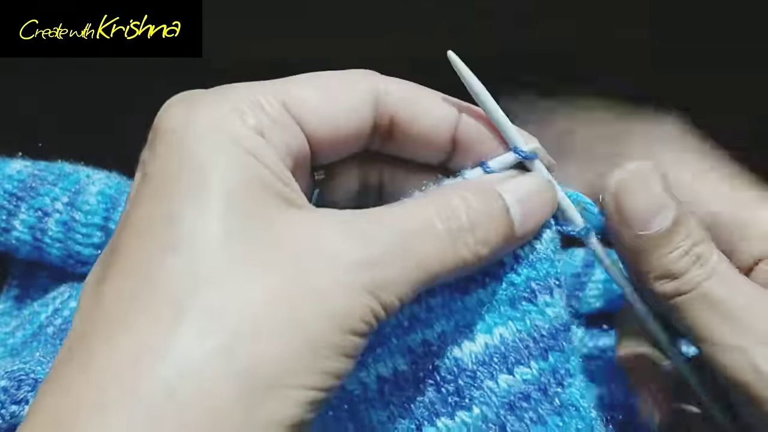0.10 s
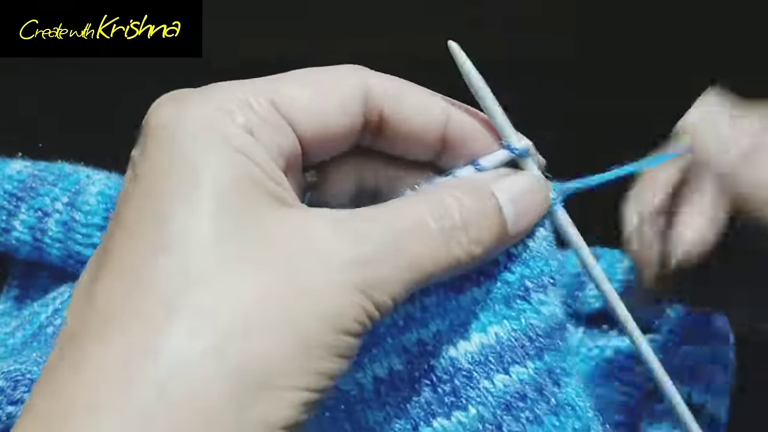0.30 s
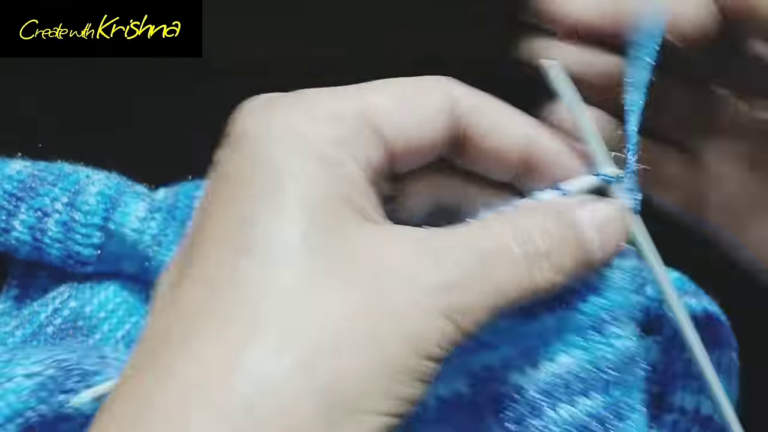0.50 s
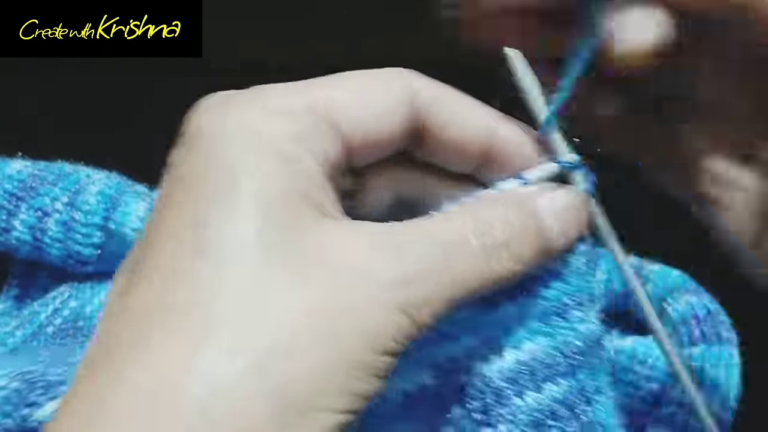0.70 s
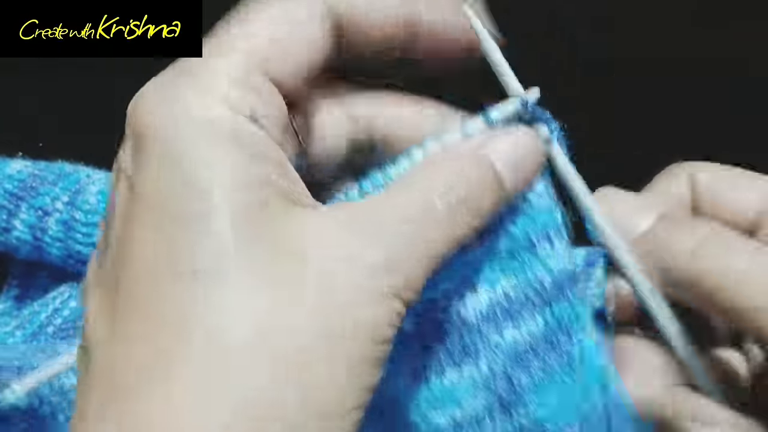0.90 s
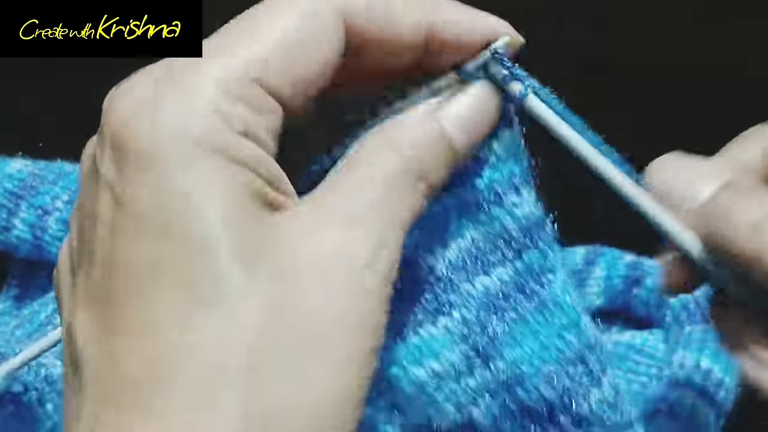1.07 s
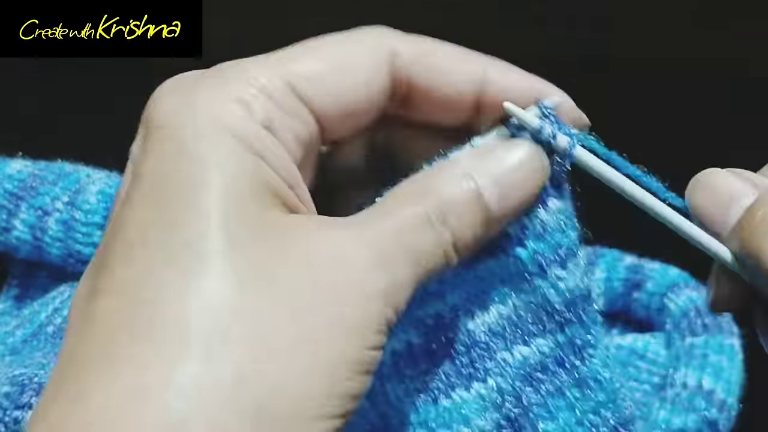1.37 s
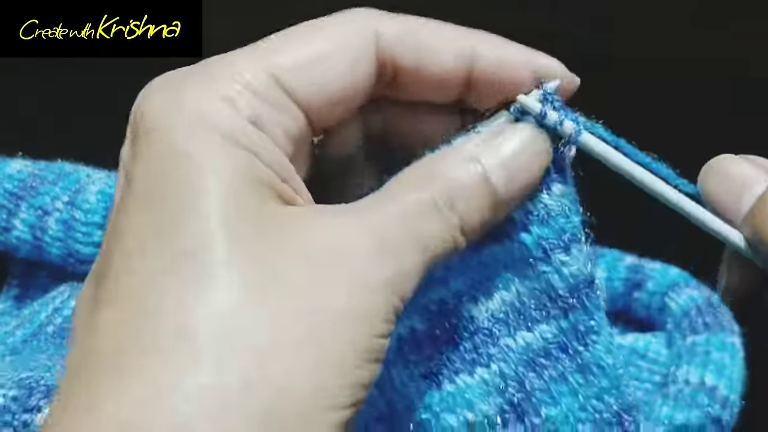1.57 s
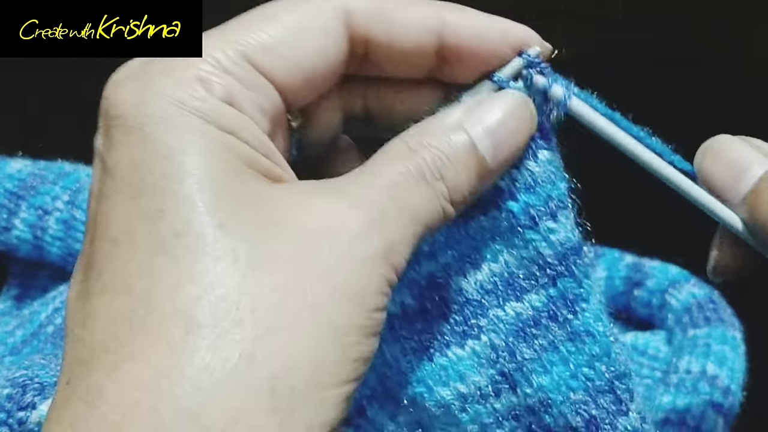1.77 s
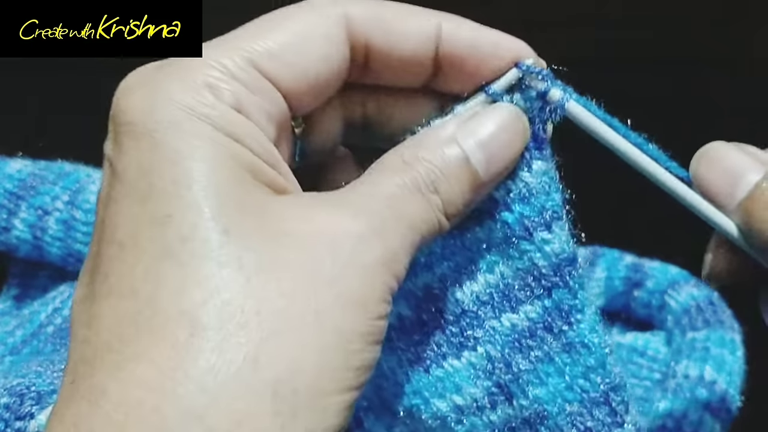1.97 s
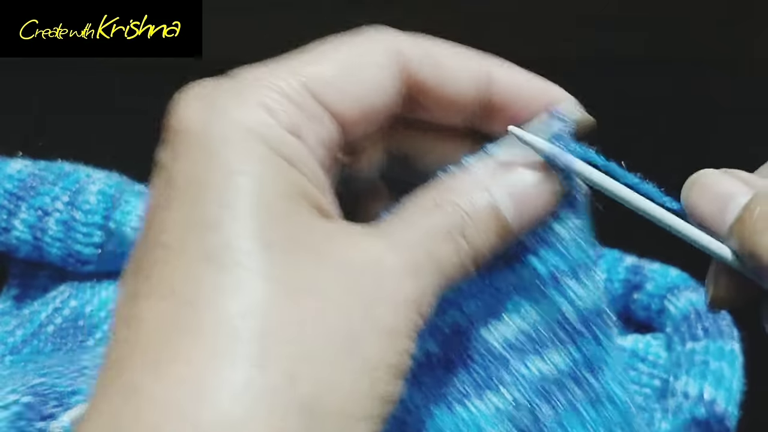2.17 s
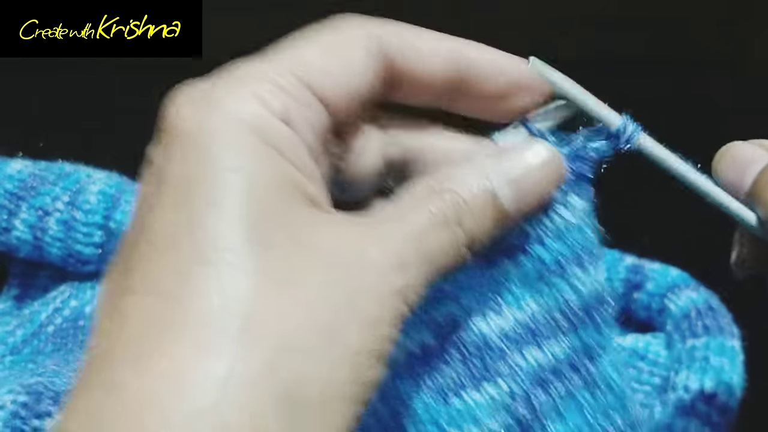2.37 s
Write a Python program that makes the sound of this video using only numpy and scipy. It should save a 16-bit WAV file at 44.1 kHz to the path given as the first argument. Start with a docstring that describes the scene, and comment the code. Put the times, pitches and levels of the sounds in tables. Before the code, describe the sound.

Metal knitting needle's end cracks and rings once, then faint scrapes, wool slides and tiny clicks over low hum.

```python
"""Knitting with metal needles

Close-up knitting in a quiet room. The free end of one needle knocks on a hard surface: a noisy crack,
ringing sine tones and a low thud. It taps twice more and drags, as noise bursts and grainy noise through
resonances. Swelling noise makes the wool slide and rustle; short noise snaps and sines tick the tips.
Behind are a fan or similar motor, made of wavering sines, and soft room noise.
"""
import sys
import numpy as np
from scipy import signal
from scipy.fft import rfft, irfft, next_fast_len
from scipy.io import wavfile
from scipy.ndimage import map_coordinates

SR = 44100
rng = np.random.default_rng(int(sys.argv[2]) if len(sys.argv) > 2 else 0)


def unload_audio(sound):
    """Save the sound as a 16-bit wav file, at the path given as the first command line argument."""
    columns = np.transpose(np.atleast_2d(sound))
    # keep every value between -1 and 1, then stretch to whole-number steps
    steps = np.round(np.clip(columns, -1, 1) * 32767)
    wavfile.write(sys.argv[1], SR, steps.astype(np.int16))


N = 110250  # samples: 2.5 s


def amp(db):
    """Turn decibels into a gain."""
    return 10 ** (np.asarray(db) / 20)


def unit(x):
    """Scale to rms 1."""
    return x / np.sqrt(np.mean(x ** 2) + 1e-20)


def along(points, hz):
    """Read values between (f/Hz, value) points, on a log frequency axis."""
    f, v = np.transpose(points)
    return np.interp(np.log(hz + 1), np.log(f + 1), v)


def colour_of(points):
    """Make a gain for each frequency from (f/Hz, level/dB) points."""
    return lambda f: amp(along(points, f))


def since(start):
    """Seconds since the start, zero before it."""
    return np.maximum(np.arange(N) / SR - start, 0)


def attack(t, seconds):
    """Rise smoothly from 0 towards 1."""
    return 1 - np.exp(-t / seconds)


def fade(t, t60):
    """Die away exponentially, by 60 dB in t60 seconds."""
    return np.exp(-np.log(1000) * t / t60)


def pan(db):
    """Left and right gains for a level difference; positive is louder on the left."""
    return amp(np.array([[.5], [-.5]]) * db)


def wobble(rate):
    """Draw a smooth random curve with this many random points a second."""
    points = rng.standard_normal(int(N * rate / SR) + 4)
    return map_coordinates(points, [np.arange(N) * rate / SR])


def filtered(x, response):
    """Shape x with a gain, and perhaps a phase, for each frequency."""
    m = next_fast_len(N + SR // 2)
    return irfft(rfft(x, m) * response(np.fft.rfftfreq(m, 1 / SR)), m)[..., :N]


def noise(colour, alike, lean=None):
    """Stereo noise of rms 1 with a colour, a left-right likeness and a lean to one side."""
    def mid_and_side(f):
        likeness = alike if np.isscalar(alike) else along(alike, f)
        angle = np.arccos(np.clip(likeness, -1, 1)) / 2 + 0 * f
        return colour(f) * np.array([np.cos(angle), np.sin(angle)])

    mid, side = filtered(rng.standard_normal((2, N)), mid_and_side)
    pair = np.array([mid + side, mid - side])
    if lean:
        pair = filtered(pair, lambda f: pan(along(lean, f)))
    return unit(pair)


# colour of the knock's crack (f/Hz, relative level/dB)
CRACK_COLOUR = [(150, -2.5), (300, -3), (490, 3), (600, -18), (800, -6), (1100, -10), (1450, 1), (1700, 3),
                (2300, -4), (2850, 1.5), (3200, -4.5), (3650, -2.5), (4350, -10.5), (5600, 6.5),
                (6200, -2.5), (7100, -1), (7600, -1.5), (8100, 0), (9000, -15), (10100, 6), (10750, -9),
                (11100, 4.5), (11500, 0.5), (12600, 0), (13100, -7.5), (13800, 1.5), (14400, -7),
                (15400, 1.5), (16000, -25)]
# lean of the crack to the left (f/Hz, left-right level/dB)
CRACK_LEAN = [(1000, 5), (5500, -7), (7200, -2.5), (8200, 9), (11000, 10), (12500, 13), (15000, 4.5)]


def crack(start, level_db, contact_s):
    """Hard contact makes a noise burst that holds for the contact, then dies fast."""
    grit = noise(colour_of(CRACK_COLOUR), .35, CRACK_LEAN)
    envelope = attack(since(start), 0.00043) * fade(since(start + contact_s), .024)
    return amp(level_db) * envelope * grit


# how the needle likes to ring, one pitch per mode (f/Hz)
NEEDLE_MODE_HZ = [3634, 5472, 5740, 5879, 6500, 7150, 8080, 10328, 11055, 11889, 12550, 13536, 15200]
# the same modes (level/dB relative to the knock's ring, t60/s, left-right level/dB)
NEEDLE_MODES = [(-48.5, 0.15, -1), (-34, 0.18, -7), (-44.5, .14, -2.5), (-26, 0.15, -1.5),
                (-44.5, 0.13, -7.5), (-34, .12, 2), (-45.5, 0.1, 6.5), (-36.5, 0.11, 14), (-34, 0.085, 5),
                (-28.5, .08, 21.5), (-38.5, 0.059, 8.5), (-40.5, 0.21, 9), (-38, .12, 18.5)]
RING_FLUTTER_DB, RING_FLUTTER_RAD = 5, .5  # random unsteadiness of loudness and phase


def needle_ring(start):
    """The struck metal rings in several modes, each a fading sine that flutters."""
    t = since(start)
    out = np.zeros((2, N))
    for hz, (db, t60, pan_db) in zip(NEEDLE_MODE_HZ, NEEDLE_MODES):
        flutter = amp(RING_FLUTTER_DB * wobble(130))
        phase = 2 * np.pi * (hz * t + rng.random()) + RING_FLUTTER_RAD * wobble(150)
        envelope = attack(t, 0.00043) * fade(t, t60)
        out += pan(pan_db) * amp(db) * envelope * flutter * np.sin(phase)
    return out


PING_HZ, PING_SAG_HZ, PING_SAG_S = 13535, 330, .003  # starts 330 Hz higher and sags to PING_HZ
PING_DB, PING_PAN_DB = -18.5, 26.5  # level relative to the knock's ring; far to the left
PING_ATTACK_S, PING_HOLD_S, PING_T60_S = .0012, .009, .04


def needle_ping(start):
    """A high, clear ping that starts slightly sharp, holds and then dies away."""
    t = since(start)
    envelope = attack(t, PING_ATTACK_S) * fade(since(start + PING_HOLD_S), PING_T60_S)
    cycles = PING_HZ * t + PING_SAG_HZ * PING_SAG_S * attack(t, PING_SAG_S)
    return amp(PING_DB) * pan(PING_PAN_DB) * envelope * np.sin(2 * np.pi * cycles)


# low modes of the struck surface (f/Hz, level/dB relative to the knock's ring, t60/s)
SURFACE_MODES = [(35.4, -50, .35), (51.33, -38.5, 0.31), (136, -60.5, 0.074), (258, -43, 0.032),
                 (353, -47, 0.034)]


def surface_thud(start):
    """The struck surface answers with low, fading sines, a little louder on the left."""
    t = since(start)
    modes = [amp(db) * fade(t, t60) * np.sin(2 * np.pi * hz * t) for hz, db, t60 in SURFACE_MODES]
    return -pan(3) * sum(modes)  # the first push is downward


# hard knocks of the needle's end (t/s, crack level/dB, ring level/dB, contact length/s)
KNOCK_TIMES = [(0.225, -21, -0.5, 0.0055)]
LAG_S = .00007  # the ring and thud reach the left side this much earlier than the right


def knocks():
    """The needle's end hits the surface: the contact cracks, the needle rings and the surface thuds."""
    cracks, rings = np.zeros((2, N)), np.zeros((2, N))
    for start, crack_db, ring_db, contact_s in KNOCK_TIMES:
        cracks += crack(start, crack_db, contact_s)
        rings += amp(ring_db) * (needle_ring(start) + needle_ping(start) + surface_thud(start))
    sides = np.array([[1], [-1]])
    return cracks, filtered(rings, lambda f: np.exp(1j * np.pi * f * LAG_S * sides))


# soft touchdowns before the loudest dragging (t/s, level/dB)
TAP_TIMES = [(0.521, -48), (.5343, -49.5)]
# colour of a tap (f/Hz, relative level/dB)
TAP_COLOUR = [(600, -19), (1300, 2.5), (2000, -6), (3000, 4.5), (4200, -4.5), (5400, -8), (6300, 1),
              (6900, -4), (7500, 6.5), (8300, -20), (9500, -15), (11000, -8), (13500, -7), (15300, -11),
              (16000, -25)]
# lean of the lighter contacts to the left, also for drag, ticks and wool (f/Hz, left-right level/dB)
LIGHT_LEAN = [(1000, -2.5), (5000, 2.5), (8000, 2.5), (13000, 12)]


def taps():
    """The needle's end sets down lightly, twice: soft bursts of coloured noise."""
    hits = 0
    for start, db in TAP_TIMES:
        t = since(start)
        hits += amp(db) * attack(t, 0.00036) * fade(t, 0.041)
    return hits * noise(colour_of(TAP_COLOUR), 0.34, LIGHT_LEAN)


# the end dragging on the surface (t/s, level/dB before the grain)
DRAG_LEVEL = [(.3, -70), (0.451, -86), (.51, -74.5), (.555, -63), (0.588, -76.5), (.66, -61.5), (.72, -63),
              (.78, -63), (.82, -59), (.85, -56), (.88, -62), (.90, -79), (1.02, -78), (1.1, -110)]
# resonances of the dragged needle and surface (f/Hz, width/Hz, relative level/dB)
DRAG_RESONANCES = [(1318.6, 130, 1.5), (1640, 45, 3), (2552, 220, 3.5), (3010, 130, 4), (3550, 560, -5),
                   (5580, 98, 3), (6010, 100, -0.5), (6400, 180, -1.5), (7520, 173, -2), (11000, 510, -13),
                   (12000, 123, 0), (13700, 130, 1), (15200, 140, -3)]


def drag():
    """Fine slips of the dragged end, heard as grainy noise, excite the resonances."""
    def body(f):
        response = 0
        for k, (centre, width, db) in enumerate(DRAG_RESONANCES):
            peak = 1j * f * width / (centre * centre - f * f + 1j * f * width)
            response += (-1) ** k * amp(db) * peak  # neighbours have opposite signs
        return response

    level_db = np.interp(np.arange(N) / SR, *np.transpose(DRAG_LEVEL), left=-120)
    grain_db = 1 * wobble(120)
    return amp(level_db + grain_db) * noise(body, 0.21, LIGHT_LEAN)


# ticks of the tips (t/s, snap level/dB, brightness/dB per octave above 2000 Hz, clack f/Hz, clack level/dB)
TICK_TIMES = [(1.8855, -40.5, 0, 5750, -50), (2.2781, -31.5, 8, 5890, -56),
              (2.462, -53, -12.5, 2620, -53.5)]
# colour of the snap before its brightness (f/Hz, relative level/dB)
TICK_COLOUR = [(800, -35), (1800, -28.5), (2700, -10), (3600, -14), (4900, -4), (8500, -11), (11000, 4),
               (13500, 10), (15500, 9), (16500, -13)]


def ticks():
    """The tips touch, damped by fingers and wool: a noise snap and a very short sine clack."""
    out = np.zeros((2, N))
    for start, db, tilt_db, clack_hz, clack_db in TICK_TIMES:
        t = since(start)

        def colour(f):
            octaves = np.log2(np.maximum(f, 2000) / 2000)
            return amp(along(TICK_COLOUR, f) + tilt_db * octaves)

        snap = noise(colour, 0.68, LIGHT_LEAN)
        out += amp(db) * attack(t, .0003) * fade(t, 0.01) * snap
        out += amp(clack_db) * fade(t, 0.0041) * np.sin(2 * np.pi * clack_hz * t)
    return out


# wool sliding along the metal (t/s at the peak, level/dB, rise/s, fall/s)
SLIDE_STROKES = [(.42, -68.5, .04, 0.041), (.57, -68.5, 0.014, .03), (.86, -64.5, 0.04, .08),
                 (1.052, -62.5, 0.023, 0.0157), (1.3, -57, .03, 0.013), (1.77, -70.5, 0.027, 0.013),
                 (2.325, -59, 0.032, .012)]
# colour of the sliding (f/Hz, relative level/dB)
SLIDE_COLOUR = [(1000, -32), (4000, -13.5), (7000, -13), (9000, -19.5), (11000, -5.5), (13200, -0.5),
                (15300, -2.5), (15900, -30)]
# fabric rustling as a stitch moves (t/s at the peak, level/dB, rise/s, fall/s)
RUSTLE_STROKES = [(1.35, -77, 0.041, 0.042), (2.343, -71, 0.012, .025)]
# colour of the rustling (f/Hz, relative level/dB)
RUSTLE_COLOUR = [(800, -21), (2800, 4), (5000, 7), (7000, -5), (9000, -13.5), (16000, -38)]
GRAIN_DB, GRAIN_RATE = 2.5, 500  # random level changes; random points per second


def rub(strokes, colour):
    """Grainy friction noise swells and dies with each stroke."""
    t = np.arange(N) / SR
    level = 0
    for peak, db, rise, fall in strokes:
        width = np.where(t < peak, rise, fall)
        level += amp(db) * np.exp(-.5 * ((t - peak) / width) ** 2)
    friction = noise(colour_of(colour), .3, LIGHT_LEAN)
    return level * unit(amp(GRAIN_DB * wobble(GRAIN_RATE)) * friction)


def drifting_tone(hz):
    """A sine of rms 1 whose phase drifts at random."""
    phase = 2 * np.pi * (hz * np.arange(N) / SR + rng.random())
    return np.sqrt(2) * np.sin(phase + 0.53 * wobble(8.5))


# tones of the motor (f/Hz, level/dB before the waver, waver/dB)
MOTOR_TONES = [(55, -72, 3.5), (145.9, -64, 0.4), (237, -71, 0), (265.2, -69, 1.5), (482, -80, 5),
               (602.7, -72, 1.5), (722, -81.5, 2.5)]


def motor_hum():
    """A fan or similar motor hums: steady pitches whose loudness wavers."""
    return sum(amp(db + waver_db * wobble(8.964)) * drifting_tone(hz) for hz, db, waver_db in MOTOR_TONES)


# the swelling and sinking of the mains hum (t/s, level/dB)
MAINS_LEVEL = [(0, -79), (.15, -59), (.58, -62.5), (.72, -71), (.87, -64), (1.0, -75), (1.14, -59),
               (1.3, -63), (1.38, -69), (1.52, -59.5), (1.78, -73), (1.95, -63), (2.5, -63)]


def mains_hum():
    """One low tone whose loudness follows a drawn curve."""
    level_db = np.interp(np.arange(N) / SR, *np.transpose(MAINS_LEVEL))
    return amp(level_db) * drifting_tone(100.6)


# colour of the room noise (f/Hz, relative level/dB)
AIR_COLOUR = [(25, -1.5), (55, -7), (80, -4), (120, -13), (180, -9.5), (255, -4.5), (310, -10), (400, -9),
              (500, -7.5), (620, -13.5), (790, -21.5), (1000, -22.5), (1600, -28), (3000, -29.5),
              (5000, -31.5), (7000, -33.5), (9000, -40), (12500, -31), (15400, -30), (15900, -67)]
# how alike left and right are (f/Hz, likeness from 0 to 1)
AIR_LIKENESS = [(60, 0.3), (200, 0.58), (500, 0.19), (1500, 0.13), (8000, 0.076)]


def room_noise():
    """Quiet noise of the room, with left and right most alike around 200 Hz."""
    return amp(-60) * noise(colour_of(AIR_COLOUR), AIR_LIKENESS)


# how long the echo lasts (f/Hz, t60/s)
ROOM_DECAY = [(200, .3), (2000, 0.15), (6000, 0.31), (14000, 0.077)]


def room(x):
    """Walls return a short tail of fading noise, whose very top dies fastest."""
    hz, t, bands = signal.stft(rng.standard_normal((2, SR // 2)), SR, nperseg=256)
    fading = bands * fade(t, along(ROOM_DECAY, hz)[:, None])
    tail = signal.istft(fading, SR, nperseg=256)[1]
    return signal.fftconvolve(x, tail / np.linalg.norm(tail[0]), axes=1)[:, :N]


def scene():
    """Needles and wool close by, with the hum and room noise behind."""
    cracks, rings = knocks()
    clicks = cracks + taps()
    echo = room(amp(-14) * clicks + amp(-18) * rings.mean(axis=0))
    needles = clicks + rings + echo + drag() + ticks()
    wool = rub(SLIDE_STROKES, SLIDE_COLOUR) + rub(RUSTLE_STROKES, RUSTLE_COLOUR)
    background = pan(0.94) * (motor_hum() + mains_hum() + room_noise())
    return needles + wool + background


def record(dry):
    """Fade out the treble from 16000 Hz to nothing at 16500 Hz."""
    return filtered(dry, lambda hz: np.clip((16500 - hz) / 500, 0, 1))


dry = scene()
out = record(dry)
unload_audio(out)
```